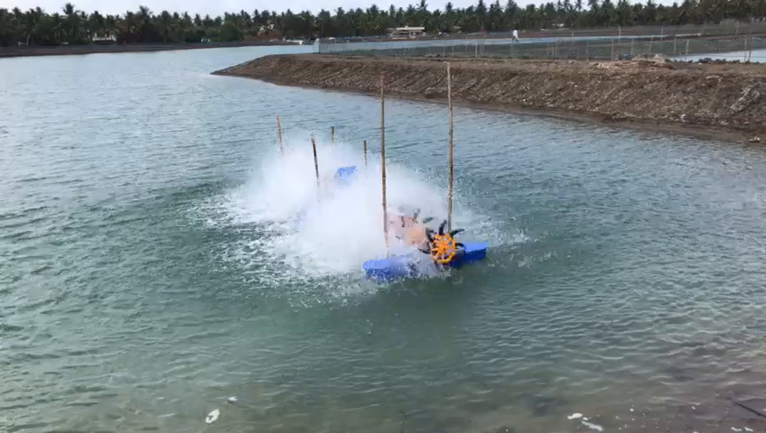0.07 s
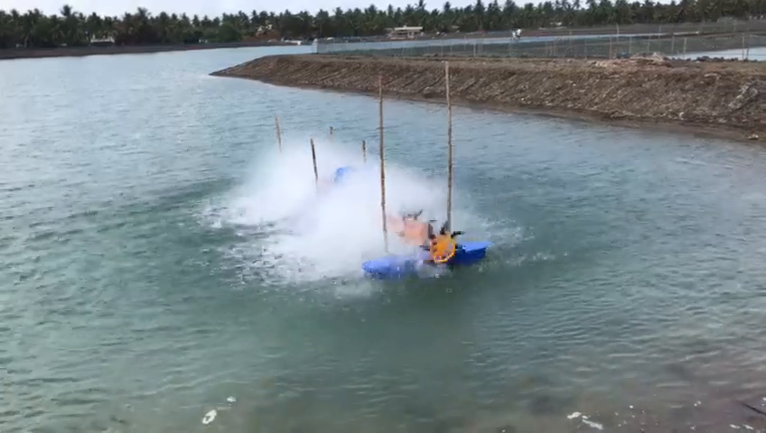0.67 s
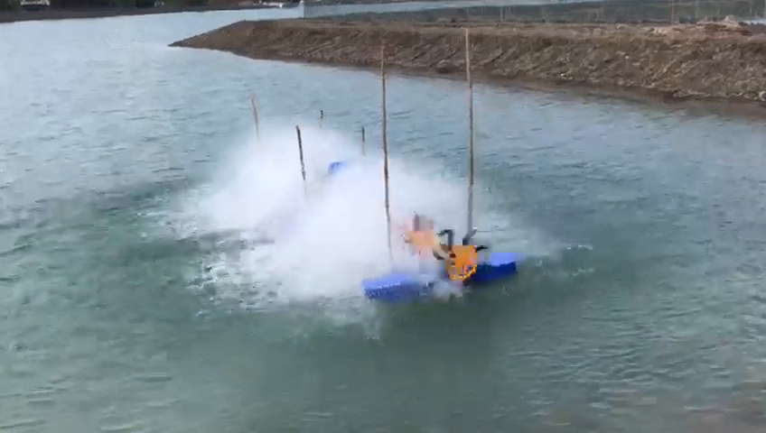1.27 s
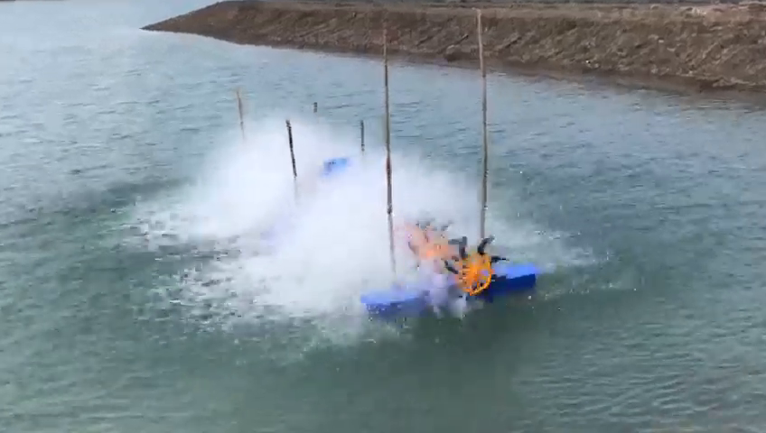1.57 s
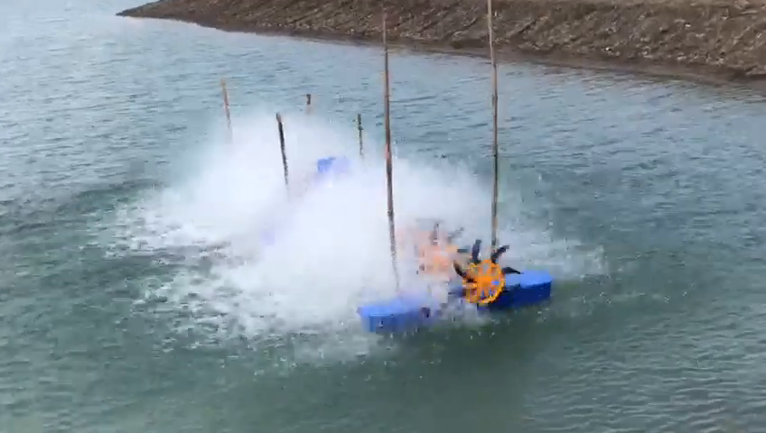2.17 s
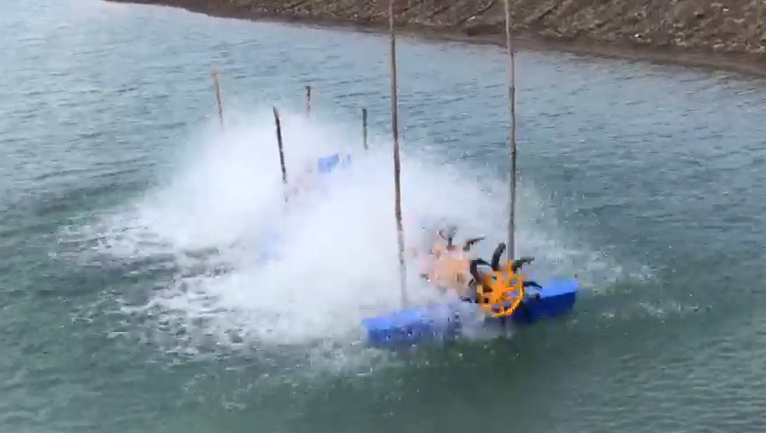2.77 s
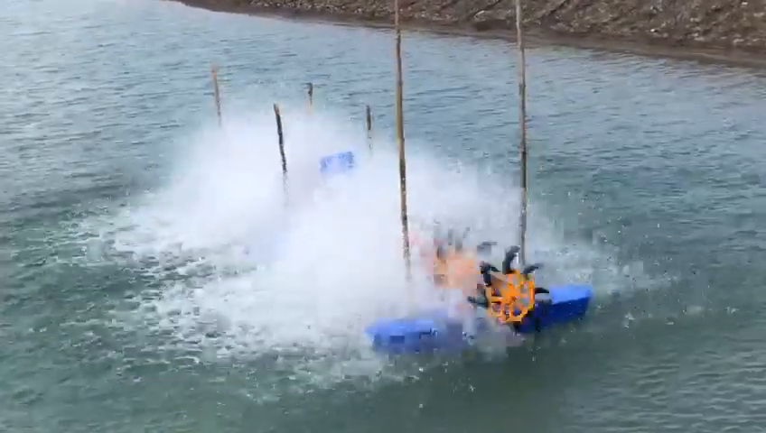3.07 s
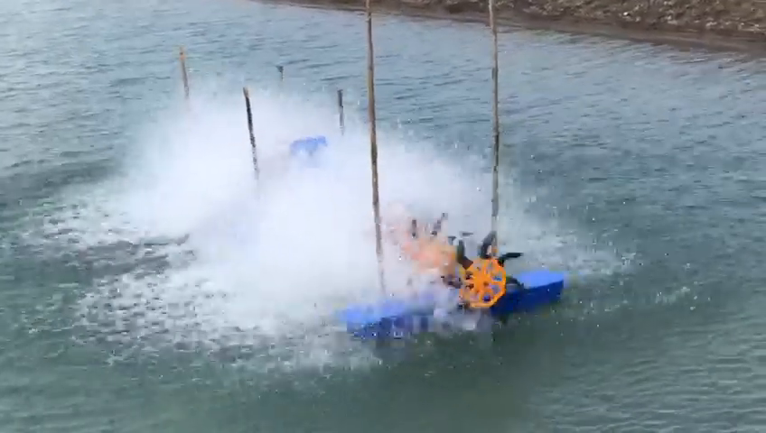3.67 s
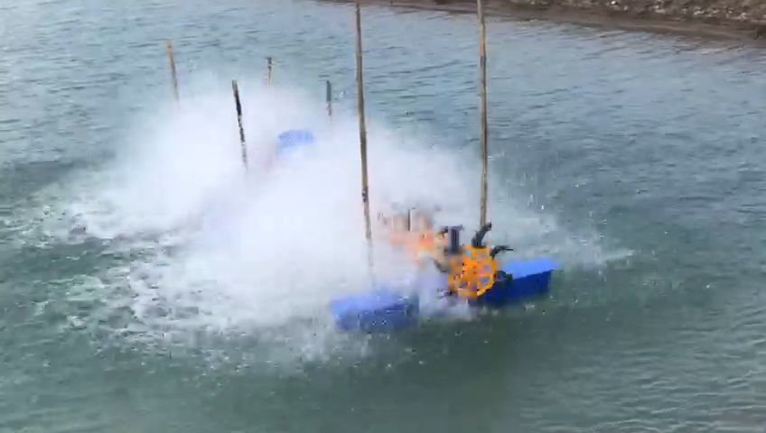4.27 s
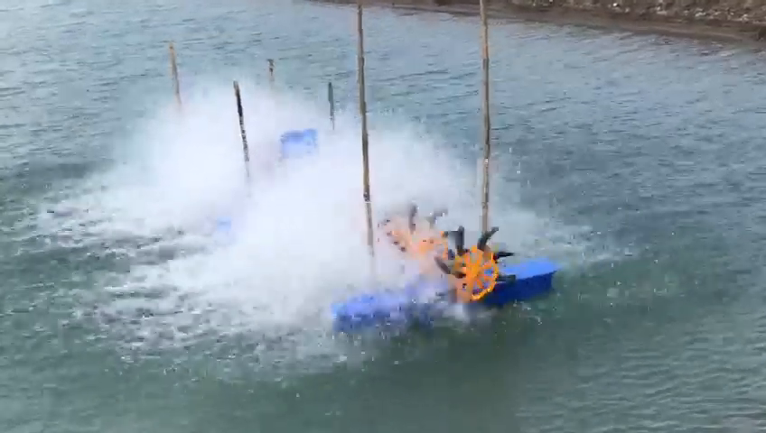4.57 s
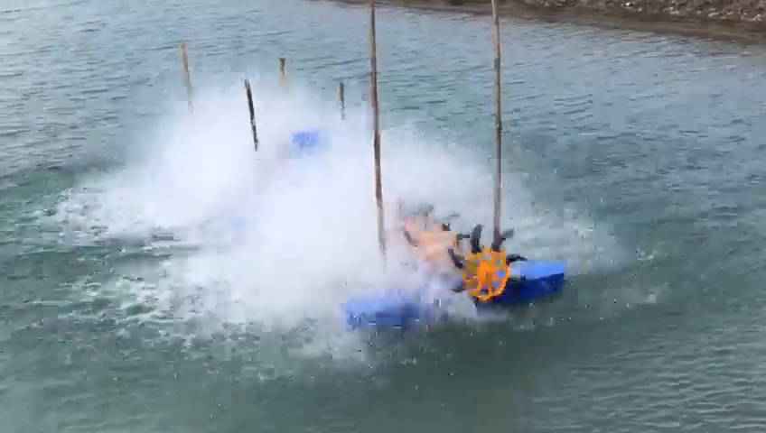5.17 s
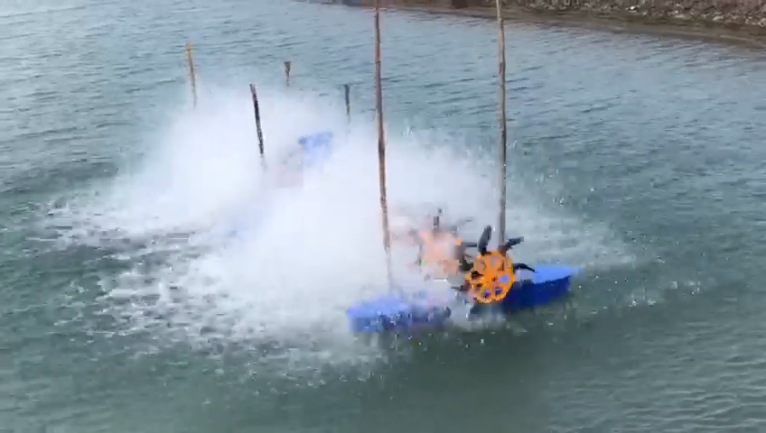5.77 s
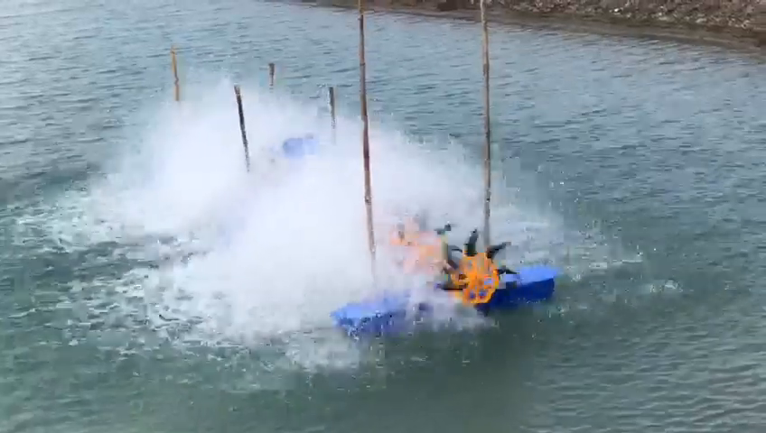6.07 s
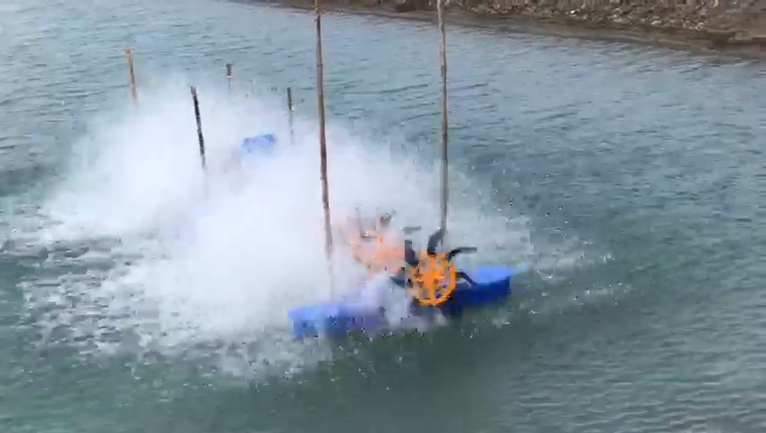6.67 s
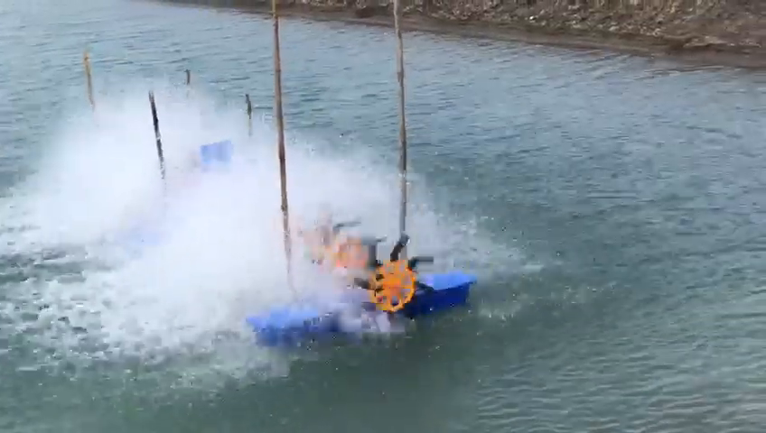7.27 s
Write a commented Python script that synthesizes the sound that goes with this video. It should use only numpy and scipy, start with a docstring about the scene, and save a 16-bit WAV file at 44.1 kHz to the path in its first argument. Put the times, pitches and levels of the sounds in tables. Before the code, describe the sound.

A paddlewheel aerator churns a pond with continuous splashing and hissing spray over a faint hum, as wind increasingly buffets the microphone.

```python
"""A paddlewheel aerator churns a pond, heard from the bank on a phone.
From the start, paddles throw up sheets of water that fall back as drops, bubbles and hissing spray.
Underneath, the floats thrum and the drive hums faintly, swelling once a turn.
Flurries of small bubbles brighten the first four seconds. Then the breeze freshens and buffets
the microphone, and two heavy sheets smack down through it, near 5.3 s and 7 s."""
import sys
import numpy as np
from scipy import signal
from scipy.fft import rfft, irfft
from scipy.io import wavfile
from scipy.ndimage import uniform_filter1d

SR = 44100
rng = np.random.default_rng(int(sys.argv[2]) if len(sys.argv) > 2 else 0)


def digitize_waveform(pressure):
    """Quantize a signal to 16-bit integers and store it at the path in sys.argv[1].

    Rows of a 2-D input are taken as channels; values are limited to [-1, 1].
    """
    field = np.atleast_2d(pressure).T
    bounded = np.clip(field, -1, 1)
    quanta = np.round(bounded * 32767).astype(np.int16)
    wavfile.write(sys.argv[1], SR, quanta)


N = 322371
TIME = np.arange(N) / SR
TURN_S, PADDLES = .585, 8  # one turn of the wheel, and the paddles around it


def undb(db):
    """Decibels to gain."""
    return 10 ** (np.asarray(db) / 20)


def unit(x):
    """Scale to rms 1."""
    return x / np.sqrt(np.mean(x ** 2))


def fader(points):
    """Gain that rides through (time_s, level_db) points."""
    return undb(np.interp(TIME, *np.transpose(points)))


def colour(x, points):
    """EQ through (freq_hz, gain_db) points, rolling off past both ends; rms 1."""
    hz, db = np.transpose(points)
    f = np.maximum(np.fft.rfftfreq(N, 1 / SR), 1)
    skirts = np.minimum(f / hz[0], 1) * np.minimum(hz[-1] / f, 1)
    gain = undb(np.interp(np.log(f), np.log(hz), db))
    return unit(irfft(rfft(x) * skirts ** 2 * gain, N))


def switched_colour(x, points, switch_s=4.25):
    """EQ through (freq_hz, early_db, late_db) points, cutting from the early tone to the late one."""
    tones = np.array(points)
    return np.where(TIME < switch_s, colour(x, tones[:, [0, 1]]), colour(x, tones[:, [0, 2]]))


def wobble(rate_hz):
    """Smooth random modulation; rms 1."""
    hold = max(int(SR / rate_hz), 2)
    steps = np.repeat(rng.standard_normal(N // hold + 2), hold)[rng.integers(hold):][:N]
    return unit(uniform_filter1d(uniform_filter1d(steps, hold), hold // 2))


def add_tail(x, decay_s):
    """Give every impulse an exponential tail."""
    return signal.lfilter([1], [1, -np.exp(-1 / (decay_s * SR))], x)


def impacts(per_s, scatter_db):
    """Randomly timed impulses of uneven size."""
    return (rng.random(N) < per_s / SR) * undb(scatter_db * np.minimum(rng.standard_normal(N), 2))


def drops(per_s, scatter_db):
    """The patter of drops: sharp ticks of either sign."""
    return unit(impacts(per_s, scatter_db) * rng.choice([-1, 1], N))


def bubbles(low_hz, high_hz, per_s, cycles, scatter_db, glide=.11, streams=48):
    """Trapped air rings briefly and rises in pitch; one stream for each bubble size."""
    out = np.zeros(N)
    for hz in np.geomspace(low_hz, high_hz, streams):
        age = np.arange(int(cycles / hz * SR)) / SR
        life = age * hz / cycles
        ring = np.sin(2 * np.pi * hz * age * (1 + glide * life)) * undb(-40 * life)
        when, strength = rng.random((int(per_s * N / SR / streams), 2)).T
        gains = undb(scatter_db * np.minimum(-np.log(1 - strength), 3))
        starts = (when * (N - len(ring))).astype(int)
        samples = starts[:, None] + np.arange(len(ring))
        out += hz * np.bincount(samples.ravel(), np.outer(gains, ring).ravel(), N)
    return unit(out)


# low body of the floats: freq_hz, gain_db
FLOAT_EQ = [(120, -1), (205, 0.5), (270, -3), (335, 1.7), (380, -2), (440, -8.5), (650, -26)]
# fader ride on the thrum: time_s, level_db
FLOAT_RIDE = [(.1, -43.5), (1.1, -44), (1.35, -49.5), (1.6, -44), (2.2, -44.5), (2.9, -49), (3.9, -48.5),
              (4.35, -43.5), (7.3, -42)]


def float_thrum():
    """The floats vibrate under the drive: a low, fluttering bed of noise."""
    flutter = undb(1.8 * wobble(30))
    return colour(rng.standard_normal(N) * flutter, FLOAT_EQ) * fader(FLOAT_RIDE)


# partials of the drive's hum: pitch_hz, gain_db
HUM_PARTIALS = [(160.5, -0.5), (269, -14), (328, -18)]
# fader ride on the hum, louder at first, softer midway, louder again late: time_s, level_db
HUM_RIDE = [(0.45, -36.5), (1.05, -37), (1.6, -45), (2.8, -41.5), (3.9, -43), (4.6, -36), (6.9, -34.5)]


def drive_hum(heaviest_s=.45, swell_s=.04, drift=.01287):
    """The drive hums, wavering in pitch and swelling at the heavy point of each turn."""
    from_heaviest_s = (TIME - heaviest_s + TURN_S / 2) % TURN_S - TURN_S / 2
    swell = .12 + .88 * np.exp(-.5 * (from_heaviest_s / swell_s) ** 2)
    shaft_time = np.cumsum(1 + drift * wobble(15)) / SR
    hum = sum(undb(db) * np.sin(2 * np.pi * hz * shaft_time) for hz, db in HUM_PARTIALS)
    return hum * swell * fader(HUM_RIDE)


# the breeze between gusts, freshening past half-way: time_s, level_db
BREEZE_RIDE = [(.1, -43.5), (.55, -43.5), (.9, -44.5), (1.45, -43.5), (2.1, -42.5), (4.1, -41), (4.6, -35),
               (5.4, -36), (6.3, -35.5), (7.3, -34)]
# gusts on top of the breeze: centre_s, length_s, level_db
GUST_CUES = [(.5, 0.15, -45), (1.175, 0.065, -44), (1.72, 0.18, -40), (2.193, 0.19, -39),
             (2.434, 0.11, -42), (2.68, 0.12, -39), (3.053, 0.32, -40.5), (3.253, 0.11, -29.5),
             (3.466, 0.19, -42), (4.34, 0.17, -40), (4.92, 0.16, -30), (5.597, 0.17, -34.5),
             (5.846, 0.16, -31), (6.018, 0.11, -28), (6.22, 0.22, -35), (6.368, 0.13, -31.5),
             (6.606, 0.15, -31), (6.85, 0.16, -31), (7.077, 0.22, -32.5)]
# bass-heavy tone of wind on the microphone: freq_hz, gain_db
RUMBLE_EQ = [(12, -29), (28, -17.5), (42, 2.5), (57, 1.5), (95, -2), (130, -6), (200, -23.5), (300, -22.5),
             (600, -68)]


def wind_rumble(gust_edge_s=.036, flutter_db=2.5):
    """Turbulence rumbles on the microphone; each gust rises, holds and dies over the breeze."""
    power = fader(BREEZE_RIDE) ** 2
    for centre_s, length_s, db in GUST_CUES:
        blowing = np.clip((length_s / 2 - abs(TIME - centre_s)) / gust_edge_s + .5, 0, 1)
        power += (undb(db) * blowing) ** 2
    turbulence = rng.standard_normal(N) * undb(flutter_db * wobble(30))
    return colour(turbulence, RUMBLE_EQ) * np.sqrt(power)


# the strongest eddies to hit the microphone: centre_s, peak_db, pitch_hz, half_length_cycles
EDDY_CUES = [(.643, -32, 78, .9), (1.164, -28, 66, 0.81), (1.210, -24.5, 78.4, 0.57),
             (1.614, -30, 100, 0.47), (1.669, -32, 85, 0.54), (1.718, -28, 70, 0.75),
             (1.775, -30.5, 66, 1.1), (2.132, -30.5, 92, 1.2), (2.194, -22, 68, .9), (2.24, -28, 95, 0.84),
             (2.269, -26, 60, 0.79), (2.465, -29, 82, 0.81), (2.629, -28, 76, .9), (2.891, -27, 58, 0.86),
             (2.951, -31, 76, 1.1), (3.001, -27.5, 67, 0.9), (3.046, -29.5, 130, 1.1), (3.077, -26, 88, .8),
             (3.123, -28.5, 85, 1.1), (3.222, -28, 62, 1), (3.252, -30.5, 160, 1.2),
             (3.275, -21.5, 97, 0.96), (3.413, -30, 70, 0.93), (4.272, -24, 86, 0.41), (4.343, -27, 72, .7),
             (4.406, -28, 62, .7), (4.613, -22, 73, 0.47), (4.794, -25, 68, .7), (4.890, -18, 63, 0.94),
             (4.931, -18, 98, 1.2), (4.982, -16.5, 72, 0.64), (5.086, -18, 58, 0.93),
             (5.22, -19.5, 58, 0.86), (5.292, -23, 70, 0.62), (5.523, -25, 80, 1.1), (5.66, -20, 88, 0.76),
             (5.809, -17, 79.6, 0.6), (5.889, -25, 76, 1.1), (6.007, -17, 57.5, 1.3),
             (6.044, -16.5, 159, .7), (6.138, -23, 63, 1.2), (6.249, -23, 61, 0.88), (6.362, -21, 62, 1.5),
             (6.577, -24.5, 72, 1), (6.623, -15, 76, 0.66), (6.772, -20.5, 57.7, 1.2),
             (6.861, -22, 60, 1.4), (6.987, -22.5, 88, 0.68), (7.019, -19.5, 115, 0.78),
             (7.058, -20, 101, 1.2), (7.122, -14.5, 67.5, 1.1), (7.157, -18, 83, 0.55)]


def add_eddies(rumble, rasp_db=-13, roundness=1.35):
    """Single eddies thump for a cycle or two, each with a rasp of finer whirls."""
    out = rumble.copy()
    rasp_eq = [(100, 1.5), (170, 0), (250, -15), (450, -31)]
    rasp = undb(rasp_db) * colour(rng.standard_normal(N), rasp_eq)
    for centre_s, db, hz, half_length in EDDY_CUES:
        cycles = (TIME - centre_s) * hz
        near = abs(cycles) < 4
        puff = np.exp(-abs(cycles[near] / half_length) ** roundness)
        thump = undb(db) * (np.sin(2 * np.pi * (cycles[near] + rng.random())) + rasp[near])
        out[near] += puff * (thump - out[near])  # crossfade to the thump and back
    return out


def paddle_flow(surge_decay_s=.072, sheet_decay_s=.0089):
    """Envelope of the thrown water: a slight surge per paddle, and sheets that land and drain away."""
    dips_s = np.arange(0, N / SR, TURN_S / PADDLES)
    timing, force = rng.standard_normal((len(dips_s), 2)).T
    starts = np.clip((dips_s + .005 * timing) * SR, 0, N - 1).astype(int)
    slaps = np.zeros(N)
    slaps[starts] = undb(2.9 * force)
    surge = add_tail(slaps, surge_decay_s)
    sheets = add_tail(impacts(per_s=150, scatter_db=4), sheet_decay_s)
    power = .87 + .025 * surge / surge.mean() + .5 * sheets / sheets.mean()
    return unit(np.sqrt(power))


# low-mid gurgle of the pool: freq_hz, early_db, late_db
POOL_EQ = [(200, -41, -42), (426, -10.5, -15.5), (553, -3.5, -4), (710, -3, -0.5), (900, -5, -5.5),
           (1230, -9.5, -3.5), (2000, -44, -50)]
# fader ride on the pool: time_s, level_db
POOL_RIDE = [(.1, -41.5), (.65, -44), (3.9, -44), (4.35, -42), (7.3, -43.5)]


def churned_pool(flow):
    """Large bubbles gurgle in a wash of noise below the wheel."""
    gurgle = bubbles(380.5, 1195, per_s=900, cycles=10, scatter_db=2)
    wash = undb(8) * rng.standard_normal(N)
    return switched_colour((gurgle + wash) * flow, POOL_EQ) * fader(POOL_RIDE)


# bright flurries of small bubbles: centre_s, level_db, swell_s
FLURRY_CUES = [(.92, -40, .15), (1.2, -45, .14), (2.43, -42, 0.081), (3.96, -42.5, 0.17)]


def bubble_flurries():
    """Showers of small bubbles swell and fade, brightening the splash."""
    swell = sum(undb(db) * np.exp(-((TIME - s) / swell_s) ** 2) for s, db, swell_s in FLURRY_CUES)
    return swell * bubbles(2000, 2700, per_s=3000, cycles=22, scatter_db=6.5, glide=.05, streams=16)


# sizzling top end of the spray: freq_hz, gain_db
SPRAY_EQ = [(2400, -1.5), (3150, -11.5), (3450, -2), (3700, -4), (4050, -1), (4550, -0.2), (4900, -2.5),
            (5300, 1), (6100, 1), (7000, -3), (7650, -6), (8600, -5), (9800, -5), (10500, -14.5)]
# fader ride on the spray, building at first: time_s, level_db
SPRAY_RIDE = [(.1, -36.5), (.6, -34.5), (2.5, -33.5), (3.15, -35.5), (3.7, -34.5), (4.8, -34.5),
              (5.05, -35), (5.75, -33.7), (6.2, -34.6), (6.9, -35), (7.3, -35)]


def spray(flow):
    """Fine droplets tick in a shimmering hiss of mist."""
    mist = drops(per_s=14000, scatter_db=4.8) + undb(1) * rng.standard_normal(N)
    shimmer = undb(.13 * wobble(17) + .51 * wobble(6))
    return colour(mist * flow ** .8 * shimmer, SPRAY_EQ) * fader(SPRAY_RIDE)


# accents where a heavy sheet of water lands: start_s, boost_db, drain_s
SHEET_CUES = [(.385, 4, 0.015), (.895, 3, .02), (1.468, 2, .03), (2.145, 3.5, .03), (3.5, 2.5, 0.021),
              (3.605, 2.5, .045), (4.38, 0, 0.027), (4.718, 1.5, 0.038), (5.349, 11.5, .0065),
              (5.53, 2.2, 0.021), (6.277, 4.5, .016), (7.0215, 12, 0.0074)]


def heavy_sheets(attack_s=.0019):
    """Gain on the falling water as each heavy sheet lands abruptly and drains away."""
    boost_db = np.zeros(N)
    for start_s, db, drain_s in SHEET_CUES:
        age = TIME - start_s
        boost_db += db * np.clip(age / attack_s, 0, 1) * np.exp(-(age / drain_s) ** 2)
    return undb(boost_db)


# brief dips in the falling water: centre_s, gain_db
LULL_CUES = [(.763, -2), (1.454, -5.5), (2.335, -1.5), (3.328, -2.3), (4.263, 0), (7.125, -5), (7.219, -3)]


def lulls(fade_s=.011):
    """Gain that ducks the falling water in the moments when little lands."""
    return undb(sum(db * np.exp(-((TIME - s) / fade_s) ** 2) for s, db in LULL_CUES))


# midrange splash of the falling water: freq_hz, early_db, late_db
SPLASH_EQ = [(450, -38, -23), (727, -9, -3), (950, 0, -1.5), (1350, 0, -0.1), (1810, -0.5, 0.5),
             (1980, -0.5, -3), (2470, -5, -5), (2720, -2, -3.5), (3270, -9.5, -10.5), (4200, -54, -34)]
# fader ride on the splash, nearly steady: time_s, level_db
SPLASH_RIDE = [(.1, -35.5), (.6, -37.5), (1.6, -35), (3.2, -36), (3.7, -35.5), (4.7, -35), (6.1, -35.5),
               (6.5, -35.5), (7.3, -35)]


def falling_water(flow):
    """The main splash: big drops patter back onto the pond and trap ringing bubbles."""
    patter = drops(per_s=16000, scatter_db=2.6)
    plinks = undb(-8) * bubbles(750, 3200, per_s=3000, cycles=14, scatter_db=.5)
    flutter = undb(.35 * wobble(25))
    splash = switched_colour((patter + plinks) * flow ** .43 * flutter, SPLASH_EQ)
    return splash * fader(SPLASH_RIDE) * heavy_sheets() * lulls()


def scene():
    """Splashing water over the machine and the wind, the same in both channels."""
    flow = paddle_flow()  # one envelope moves splash, spray and pool together
    water = falling_water(flow) + spray(flow) + churned_pool(flow) + bubble_flurries()
    machine = float_thrum() + drive_hum()
    wind = add_eddies(wind_rumble())
    return np.tile(machine + wind + water, (2, 1))


def record(dry, start_s=.084, top_hz=10450):
    """The phone opens after a moment and cuts the top end steeply."""
    lowpass = signal.ellip(10, .2, 80, top_hz, fs=SR, output="sos")
    return signal.sosfilt(lowpass, dry * (TIME >= start_s))


dry = scene()
out = record(dry)
digitize_waveform(out)
```